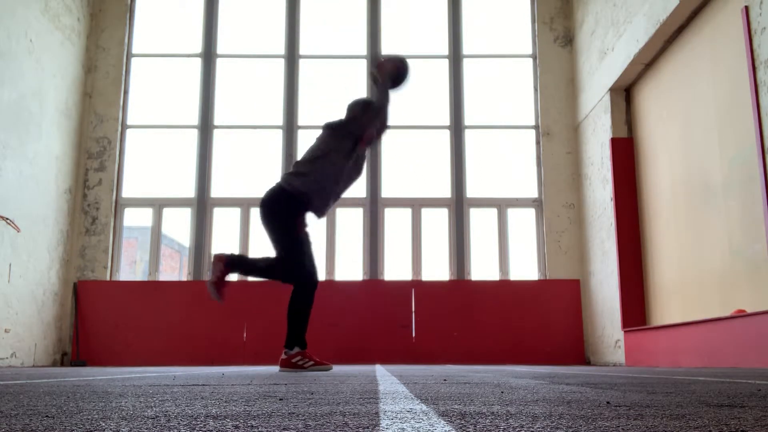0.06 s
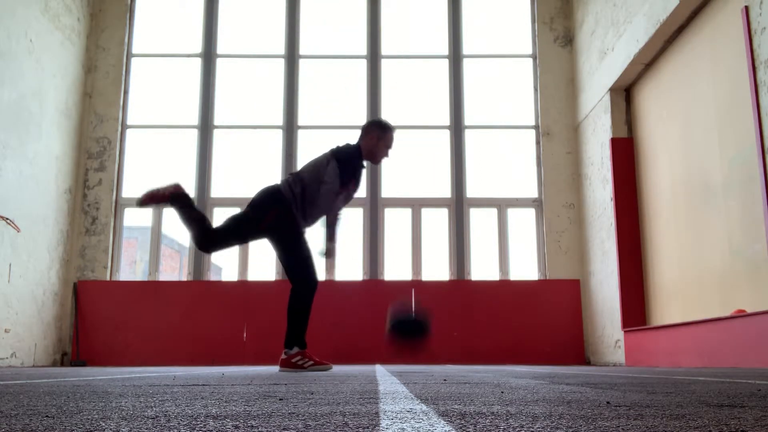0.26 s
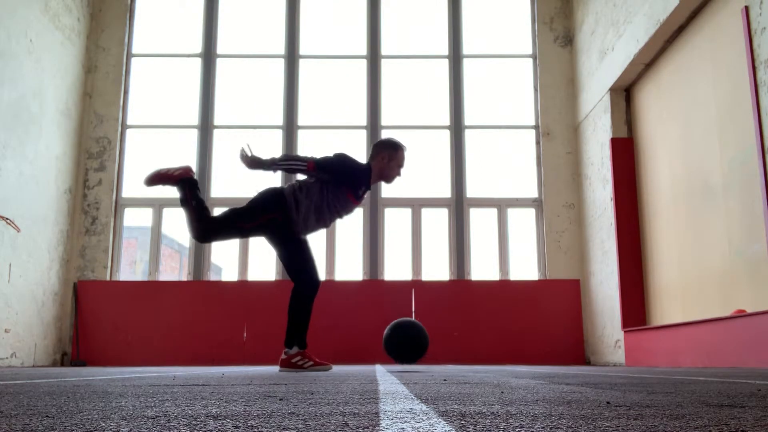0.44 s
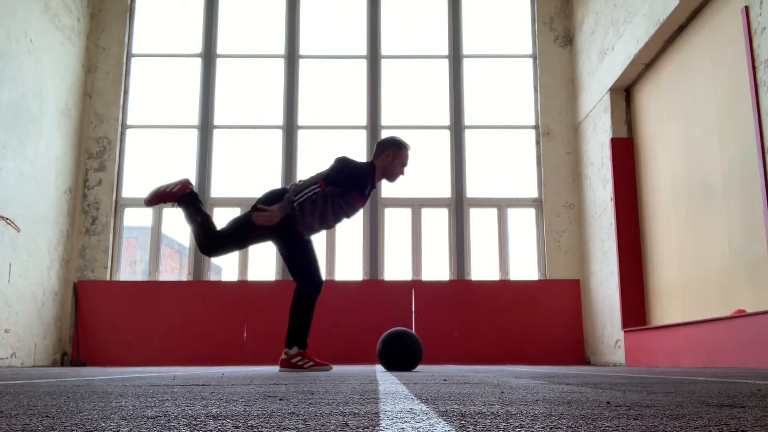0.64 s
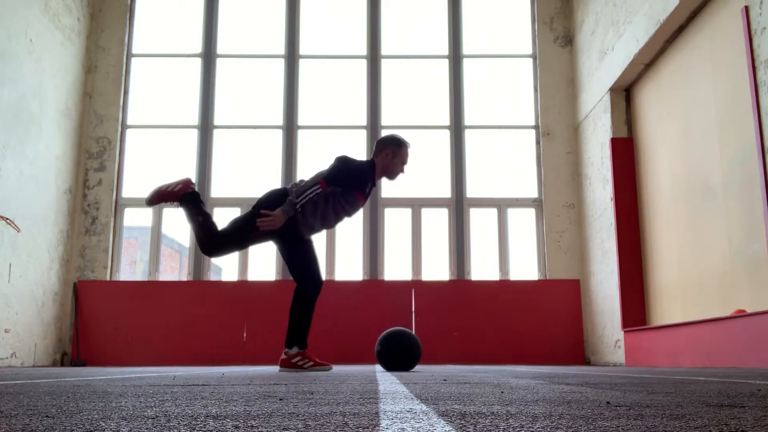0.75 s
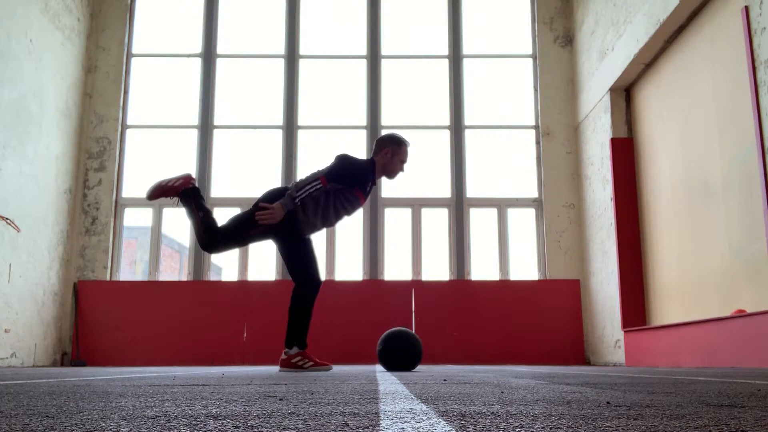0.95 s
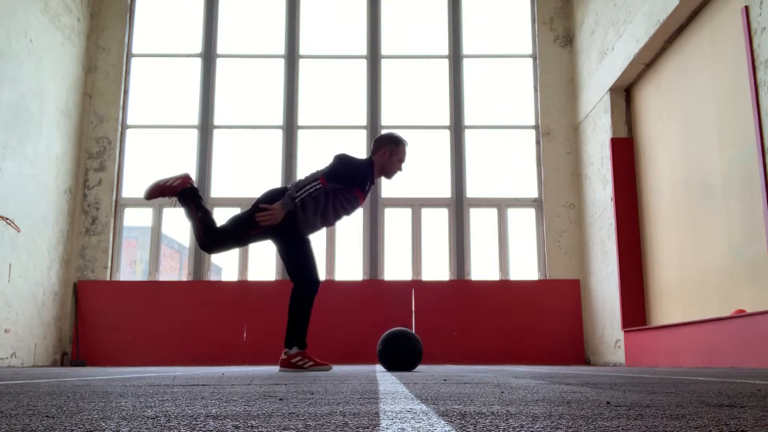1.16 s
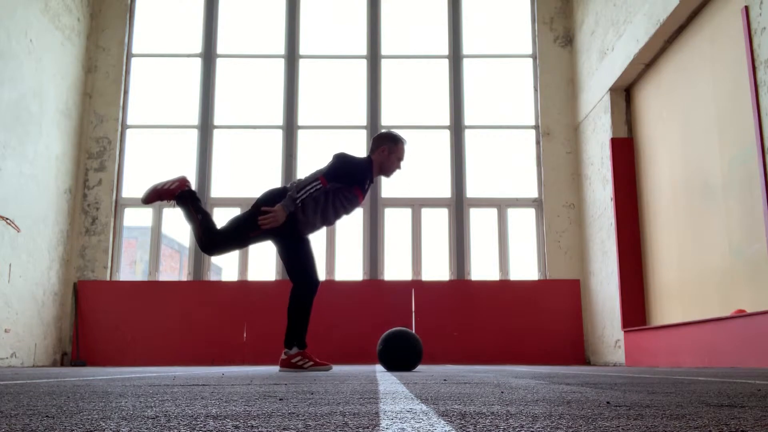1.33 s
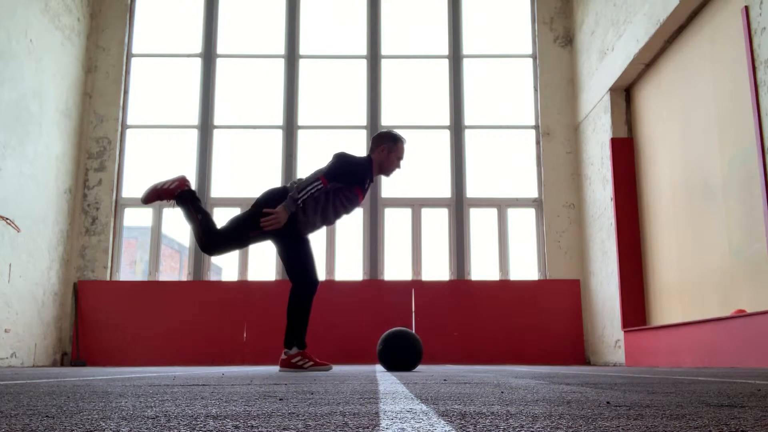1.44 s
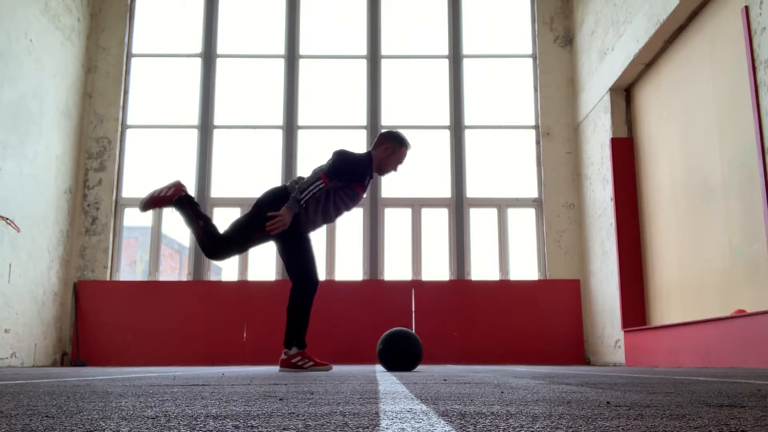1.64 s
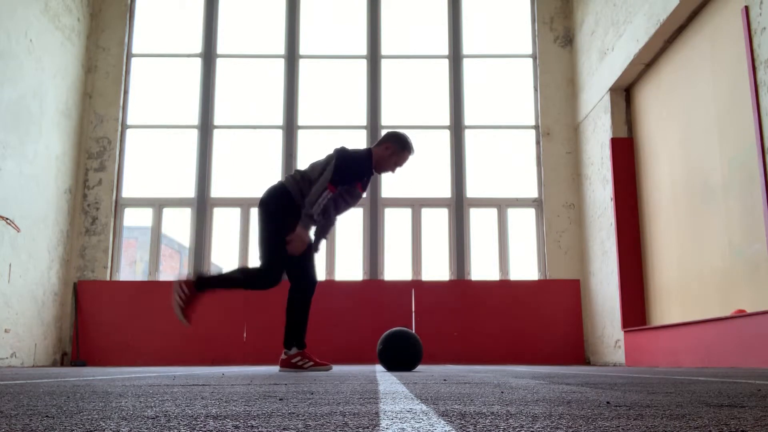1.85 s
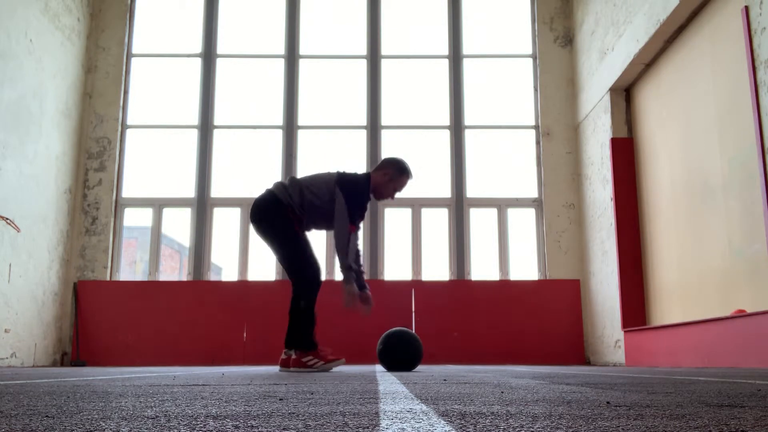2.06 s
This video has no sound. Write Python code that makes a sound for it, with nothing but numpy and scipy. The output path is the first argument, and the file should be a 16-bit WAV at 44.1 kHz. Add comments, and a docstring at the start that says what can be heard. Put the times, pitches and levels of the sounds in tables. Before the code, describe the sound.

A heavy soft ball slams once onto a hard floor, booming through a large sports hall

```python
"""Over the rumble of a large sports hall, with low hums and thin tones, sleeves rustle and swish in a throw.
A heavy, soft ball slams down once: a sine diving in pitch is the thud, a swept snap and gritty noise the slap.
Walls and ceiling return duller copies, banded noise dies away as reverberation and beating resonances boom on.
A shoe is set down at the end, as a short burst of noise."""
import sys
import numpy as np
from scipy import signal
from scipy.fft import rfft, irfft
from scipy.io import wavfile

SR = 44100
rng = np.random.default_rng(int(sys.argv[2]) if len(sys.argv) > 2 else 0)


def file_out(sig):
    """Save sig as 16-bit WAV at sys.argv[1]."""
    # one column per channel
    cols = np.atleast_2d(sig).T
    # limit, then scale
    lim = np.clip(cols, -1, 1)
    pcm = np.round(lim * 32767).astype(np.int16)
    wavfile.write(sys.argv[1], SR, pcm)


N = 92610
T = np.arange(N) / SR  # time axis in seconds

# Moments of the scene
SWISH_S, SLAM_S, STEP_S = 0.246, 0.32, 2.0805
# Spray of a scattered blow; build-up shared by the bass reverberation and the rings
SCATTER_DB, SCATTER_DECAY_S, BASS_BUILD_S = -9.5, 0.01, 0.022

# Colour of the skin cracking on the floor. Each row: frequency in Hz, level in dB per octave.
SLAP_SPECTRUM = [(1500, -41.5), (2500, -39), (3700, -27), (5500, -29.5), (7200, -37), (10500, -28),
                 (15500, -32)]


def from_db(db):
    """Decibels to gain."""
    return 10 ** (np.asarray(db) / 20)


def at_hz(table, hz, axis=1):
    """One column of a table, read on a log-frequency axis."""
    table = np.array(table)
    return np.interp(np.log(hz), np.log(table[:, 0]), table[:, axis])


def since(s):
    """Seconds since a moment, zero before it."""
    return np.maximum(T - s, 0)


def low_pass(x, hz):
    """Second-order low-pass."""
    sos = signal.butter(2, min(hz, SR / 2 - 1), "low", fs=SR, output="sos")
    return signal.sosfilt(sos, x + 1e-18)


def flutter(step_s):
    """Random swings around zero, gliding to a new value every step."""
    return np.interp(T / step_s, np.arange(1000), rng.standard_normal(1000))


def diffuse_bands():
    """Sound from all around at two spaced microphones: quarter-octave bands, unit power per octave."""
    # Likeness of the two channels. Each row: frequency in Hz, correlation from -1 to 1.
    likeness = [(50, 1), (130, 0.94), (280, 0.74), (550, 0.26), (1000, 0), (2000, 0), (8000, 0)]
    mic_lag_s, mic_ripple = 0.000305, 0.42
    edges = np.geomspace(20, 17000, 40)
    white = rng.standard_normal((2, 2, N + SR // 2))  # neighbouring bands take turns at two sources
    for k, (low, high) in enumerate(zip(edges, edges[1:])):
        hz = np.sqrt(low * high)
        sos = signal.butter(3, [low, high], "band", fs=SR, output="sos")
        pair = signal.sosfilt(sos, white[k % 2])[:, -N:]  # drop the filter's onset
        mid, side = pair / pair.std(axis=1, keepdims=True) / 2
        alike = np.clip(at_hz(likeness, hz), -1, 1)
        stereo = np.sqrt((1 + alike) / 2) * mid + np.sqrt((1 - alike) / 2) * side * [[1], [-1]]
        if hz > 2000:
            # the right channel also holds a late copy of the left
            share = np.clip(mic_ripple * (1 - alike), 0, 1)
            late = np.roll(stereo[0], int(mic_lag_s * SR))
            stereo = np.array([stereo[0], np.sqrt(1 - share ** 2) * stereo[1] + share * late])
        yield hz, stereo


def air(spectrum):
    """Diffuse noise with a given spectrum, silent below its first point."""
    return sum(from_db(at_hz(spectrum, hz)) * band for hz, band in diffuse_bands() if hz > spectrum[0][0])


def resonance(hz, width_hz):
    """Noise ringing in one narrow resonance; rms 1."""
    edges = [hz - width_hz / 2, hz + width_hz / 2]
    sos = signal.butter(2, edges, "band", fs=SR, output="sos")
    x = signal.sosfilt(sos, rng.standard_normal(N + SR))[SR:]
    return x / x.std()


def rumble():
    """The hall's steady rumble and air is broad noise, with narrow resonances swaying in level."""
    # Steady noise of the hall. Each row: frequency in Hz, level in dB per octave.
    steady = [(20, -50.5), (35, -47), (55, -36), (90, -36), (150, -37.5), (210, -32), (260, -39),
              (330, -36.5), (480, -41.5), (700, -44), (1000, -50), (1600, -60), (2800, -63.5),
              (4200, -64.5), (5500, -75), (8000, -85), (15000, -88)]
    # Narrow resonances in the rumble. Each row: frequency in Hz, width in Hz, level in dB rms before the sway.
    drones = [(54.6, 11.7, -43), (212, 35.7, -39.5), (316.3, 13.5, -44.5), (383, 16.3, -47.5),
              (495.8, 16, -51.5)]
    sway_db, sway_s = 2.5, 0.083
    out = air(steady)
    for hz, width_hz, db in drones:
        out = out + from_db(db + sway_db * flutter(sway_s)) * resonance(hz, width_hz)
    return out


def sleeves():
    """Clothes rustle through the throw and swish as the arms whip down."""
    # Swish at the fastest moment of the throw. Each row: frequency in Hz, level in dB per octave.
    swish = [(800, -68), (2000, -75), (4500, -59), (8500, -56.5), (15000, -53.5)]
    # Softer rustle through the whole throw. Each row: frequency in Hz, level in dB per octave.
    rustle = [(900, -62.5), (2000, -58), (3700, -58), (6000, -71.5), (10000, -72), (15000, -73.5)]

    def swell(rise_s, fall_s):
        """Exponential rise and fall about the fastest moment."""
        return np.exp(-np.maximum(SWISH_S - T, 0) / rise_s - since(SWISH_S) / fall_s)

    return air(swish) * swell(rise_s=0.012, fall_s=0.062) + air(rustle) * swell(rise_s=0.2, fall_s=0.13)


def tones():
    """Low hums and faint thin tones swell and fade, their pitch wavering at random."""
    # Each row: loudest moment in seconds, frequency in Hz, peak level in dB, half length in seconds.
    swells = [(.07, 668, -47.5, 0.063), (0.242, 669, -40, 0.056), (0.774, 335.6, -30.5, 0.049),
              (1.104, 3820, -65.5, 0.028), (1.11, 214, -30, 0.073), (1.579, 198, -29, 0.035),
              (1.82, 205, -28.5, 0.036), (1.918, 3790, -69, 0.049)]
    waver_share, waver_s = 0.0028, 0.02
    out = 0
    for s, hz, db, half_s in swells:
        wavering_hz = hz * (1 + waver_share * flutter(waver_s))
        tone = np.sin(2 * np.pi * np.cumsum(wavering_hz) / SR)
        out = out + from_db(db) * tone * np.exp(-((T - s) / half_s) ** 2)
    return out


def thud(s):
    """The floor flexes under the ball; high ripples arrive first, so the pitch dives while the skin rings."""
    # The skin rings for an instant. Each row: frequency in Hz, level in dB before the low-pass, t60 in seconds.
    skin_modes = [(720, -5.5, 0.01), (828, -4.5, 0.013), (1129, -9, 0.016), (1260, -22, 0.014),
                  (1563, -19, 0.019)]
    start_hz, end_hz, glide_s = 1692, 54.2, 0.00251
    flex_db, attack_s, decay_s, top_hz = -6, 0.0017, 0.014, 1470
    t = since(s)
    hz = end_hz + (start_hz - end_hz) * np.exp(-t / glide_s)
    dive = np.sin(2 * np.pi * np.cumsum(hz * (t > 0)) / SR)
    flex = from_db(flex_db) * dive * np.exp(-(t / decay_s) ** 2)
    skin = sum(from_db(db - 60 * t / t60) * np.sin(2 * np.pi * f * t) for f, db, t60 in skin_modes)
    blow = (skin - flex) * (1 - np.exp(-t / attack_s))
    soft = signal.butter(6, top_hz, fs=SR, output="sos")
    return signal.sosfilt(soft, blow + 1e-18)


def slap_colour(hz):
    """Gain of the skin's slap at each frequency, falling steeply below the first point of its spectrum."""
    per_octave = np.sqrt(SR / hz / np.log(4))  # flat spectrum to equal power per octave
    return from_db(at_hz(SLAP_SPECTRUM, hz)) * per_octave / (1 + (SLAP_SPECTRUM[0][0] / hz) ** 8)


def slap(s, decay_s):
    """The skin meets the floor in a short gritty burst of coloured noise."""
    spread = 1  # strength of each channel's own noise beside the common one
    hz = np.arange(1, N // 2 + 2) * SR / N
    white = rng.standard_normal(N) + spread * rng.standard_normal((2, N))
    white /= np.hypot(1, spread)
    return irfft(rfft(white) * slap_colour(hz), N) * (T > s) * np.exp(-since(s) / decay_s)


def crack(s):
    """One sharp snap, its highest ripples first, reaching the left microphone before the right."""
    crack_db, sweep_s, right_lag_s = 12.5, 0.000478, 0.000387
    hz = np.arange(1, N // 2 + 2) * SR / N
    travel_s = sweep_s * np.sqrt(SLAP_SPECTRUM[0][0] / hz)
    # summing the travel time over frequency gives the phase in cycles
    phase = np.cumsum(travel_s) * SR / N + hz * (s + np.array([[0], [right_lag_s]]))
    return from_db(crack_db) * irfft(slap_colour(hz) * np.exp(-2j * np.pi * phase), N)


def scattered(x, spray_db):
    """Nearby surfaces blur a blow over some milliseconds, a little differently at each microphone."""
    spray = rng.standard_normal(N) + rng.standard_normal((2, N)) / 2
    spray *= np.exp(-T / SCATTER_DECAY_S)
    spray /= np.linalg.norm(spray, axis=1, keepdims=True)
    return x + from_db(spray_db) * signal.fftconvolve(spray, np.atleast_2d(x), axes=1)[:, :N]


def blow():
    """The ball strikes: a thud slightly to the right, and the skin's snap and grit just after it."""
    thud_pan_db, slap_after_s = -1, 0.000194
    grit_db, grit_decay_s, slap_spray_db = -3.5, 0.0015, -4
    slap_s = SLAM_S + slap_after_s
    smack = crack(slap_s) + from_db(grit_db) * slap(slap_s, grit_decay_s)
    body = scattered(thud(SLAM_S), SCATTER_DB) * from_db([[thud_pan_db / 2], [-thud_pan_db / 2]])
    return body + scattered(smack, slap_spray_db)


def hall():
    """The reverberation swells, then dies band by band in rough clusters of reflections, the bass last."""
    # Each row: frequency in Hz, level in dB per octave before build-up and decay, t60 in seconds.
    reverb = [(25, -39.5, 5.1), (58, -27.5, 4.1), (114, -27, 3.7), (160, -30, 2.6), (215, -21.5, 2.3),
              (268, -18, 1.8), (472, -25, 1.78), (800, -33, 1.66), (1090, -37.5, 1.6), (1200, -37, 0.25),
              (1650, -42.5, 0.78), (3700, -39.5, 0.95), (6700, -40, 0.72), (10800, -42, 0.46),
              (15900, -42.5, 0.29)]
    delay_s, treble_build_s = 0.0032, 0.036
    rough_db, rough_s = 1.1, 0.004
    t, out = since(SLAM_S + delay_s), 0
    together = flutter(rough_s)  # swings common to all bands above 500 Hz
    for hz, band in diffuse_bands():
        build_s = at_hz([(500, BASS_BUILD_S), (2500, treble_build_s)], hz)
        fall_db = -60 * t / at_hz(reverb, hz, axis=2)
        uneven_db = rough_db * (together + flutter(2 * rough_s)) * (hz > 500)
        level = from_db(at_hz(reverb, hz) + fall_db + uneven_db)
        out = out + band * level * (1 - np.exp(-(t / build_s) ** 2))
    return out


def cluster(hz, count=3):
    """A few close modes that beat against each other; rms 1."""
    width_hz = 12.99
    spacing = (np.arange(count) + rng.uniform(.2, .8, count)) / count - .5
    cycles = np.outer(hz + width_hz * spacing, T) + rng.random((count, 1))
    return np.sin(2 * np.pi * cycles).sum(axis=0) * np.sqrt(2 / count)


def rings():
    """The blow sets room resonances booming and metal fittings ringing faintly; they beat as they die."""
    # Each row: frequency in Hz, rms level in dB before build-up and decay, t60 in seconds.
    modes = [(56.4, -25.5, 5.8), (70.45, -24.5, 2.2), (121.8, -21, 2.1), (281.2, -21.5, 0.64),
             (322, -25.5, 1.61), (361.7, -26.5, 1.1), (492.3, -33.5, 1.4), (644, -35, 1.3), (677, -40, 1.4),
             (810, -33, .9), (843, -39.5, 1), (1133, -50.5, 1.2), (1287, -46.5, 0.75), (1932, -59.5, 0.91),
             (2312, -57.5, 1), (2518, -57, 1.5), (3135, -54.5, 0.92), (3230, -57.5, 0.32),
             (3390, -56.5, 0.6), (3540, -56, 0.64)]
    t = since(SLAM_S)
    out = sum(from_db(db - 60 * t / t60) * cluster(hz) for hz, db, t60 in modes)
    return out * (1 - np.exp(-t / BASS_BUILD_S))


def echoes(slap_top_hz=6500):
    """Walls and ceiling return duller copies of the blow."""
    # Hard reflections. Each row: delay in seconds, thud gain in dB, thud cut-off in Hz, slap gain in dB.
    reflections = [(0.0172, 0, 370, -27), (0.035, -3, 556, -3.5), (0.0564, -13.5, 694, -17),
                   (.0793, -23, 700, -11), (.086, -1.5, 390, -20), (.104, -5, 387, -19),
                   (0.116, -17, 1100, -9), (.176, -15.5, 487, -31), (.219, -17, 714, -25)]
    smear_s = 0.0019  # decay of each returned slap
    out = 0
    for delay_s, thud_db, thud_top_hz, slap_db in reflections:
        s = SLAM_S + delay_s
        dull_thud = from_db(thud_db) * low_pass(thud(s), thud_top_hz)
        dull_slap = from_db(slap_db) * low_pass(slap(s, smear_s), slap_top_hz)
        out = out + scattered(dull_thud, SCATTER_DB) + dull_slap
    return out


def step():
    """A sole scuffs down onto the floor: noise with a quick attack and a short decay."""
    # Sole meeting the floor. Each row: frequency in Hz, level in dB per octave before the envelope.
    sole = [(300, -58), (900, -36), (1500, -41.5), (2000, -74), (4500, -58), (8000, -67), (15000, -64)]
    rise_s, decay_s = 0.0021, 0.07
    t = since(STEP_S)
    return air(sole) * (1 - np.exp(-t / rise_s)) * np.exp(-t / decay_s)


def scene():
    """Throw, blow, the hall's answer and the step, over the rumble."""
    balance_db = 1  # the room is this much louder on the left than on the right
    room = rumble() + tones() + hall() + rings() + echoes()
    return sleeves() + blow() + step() + room * from_db([[balance_db / 2], [-balance_db / 2]])


def record(dry):
    """An elliptic low-pass cuts the top steeply."""
    cutoff_hz = 15900
    return signal.sosfilt(signal.ellip(10, .1, 80, cutoff_hz, fs=SR, output="sos"), dry)


dry = scene()
out = record(dry)
file_out(out)
```